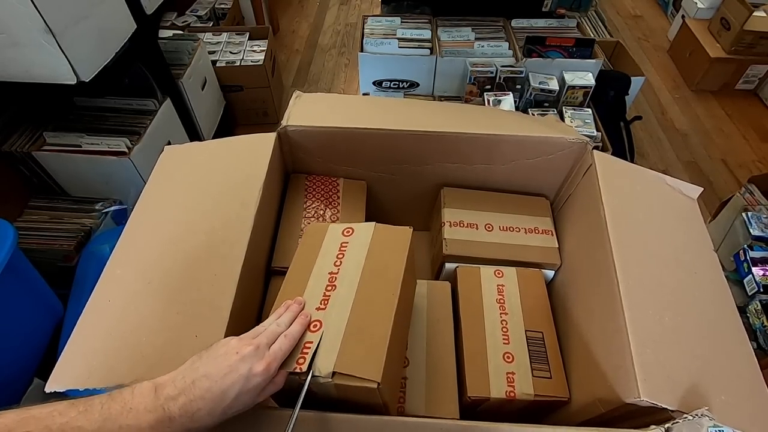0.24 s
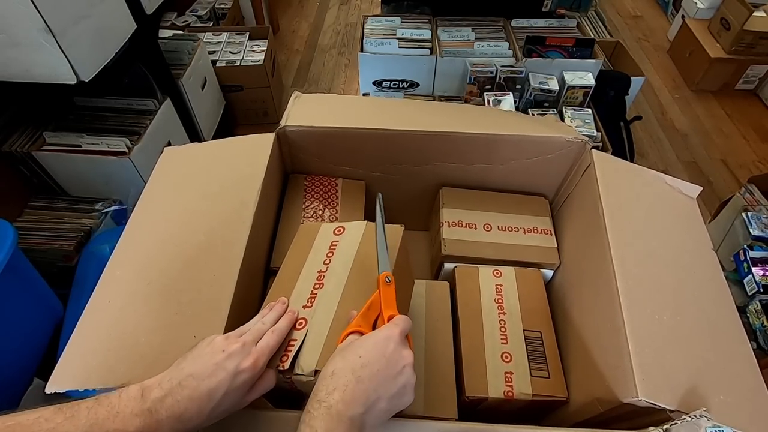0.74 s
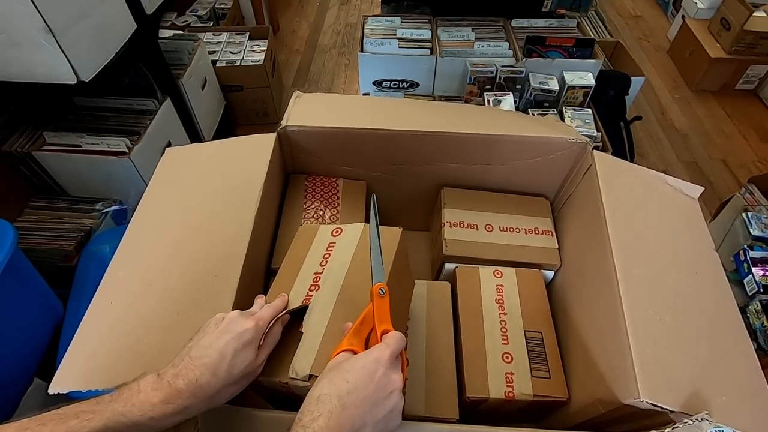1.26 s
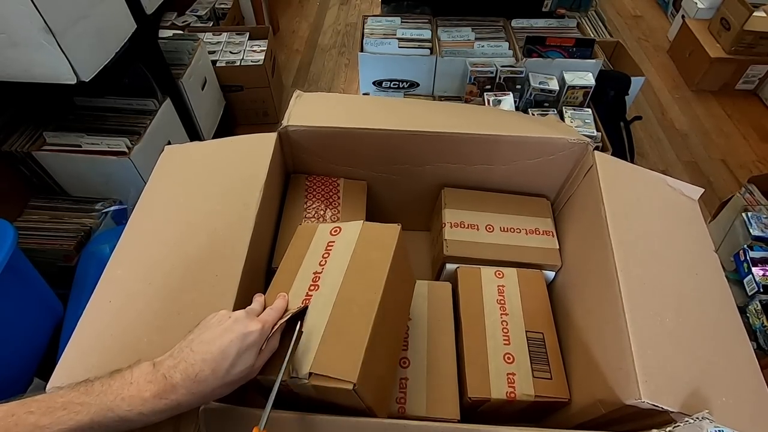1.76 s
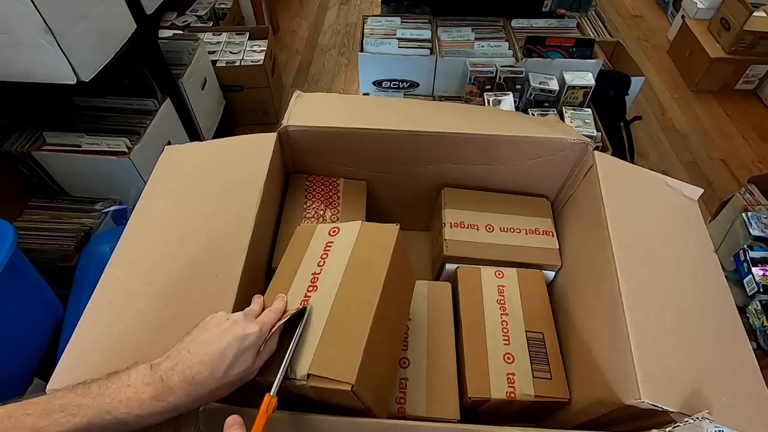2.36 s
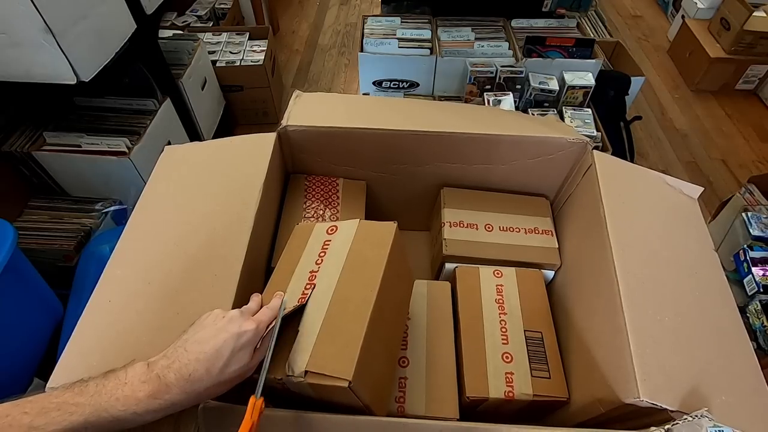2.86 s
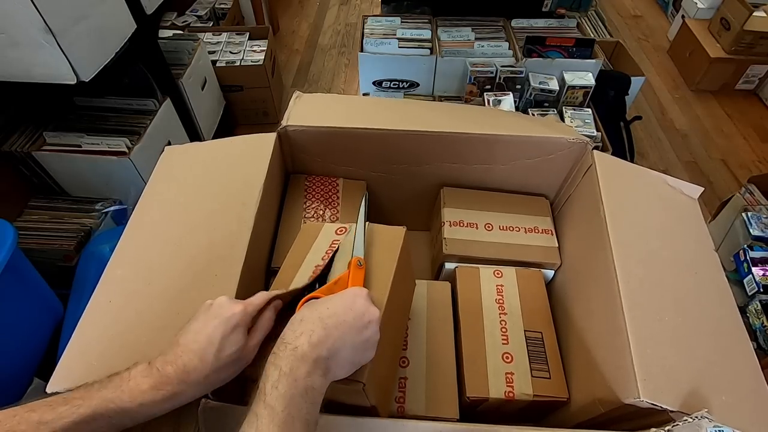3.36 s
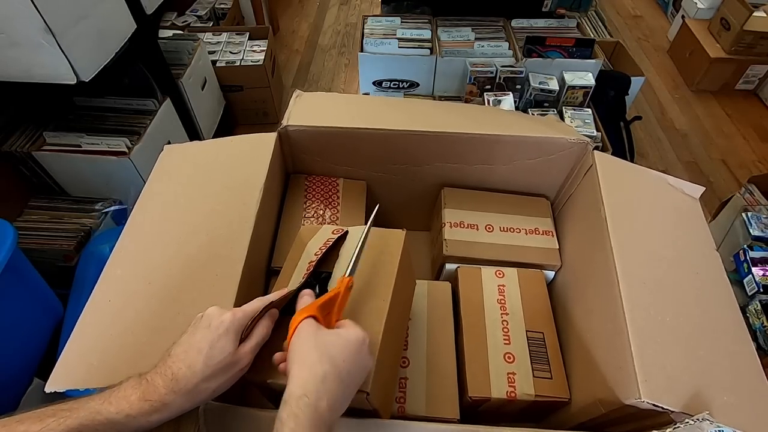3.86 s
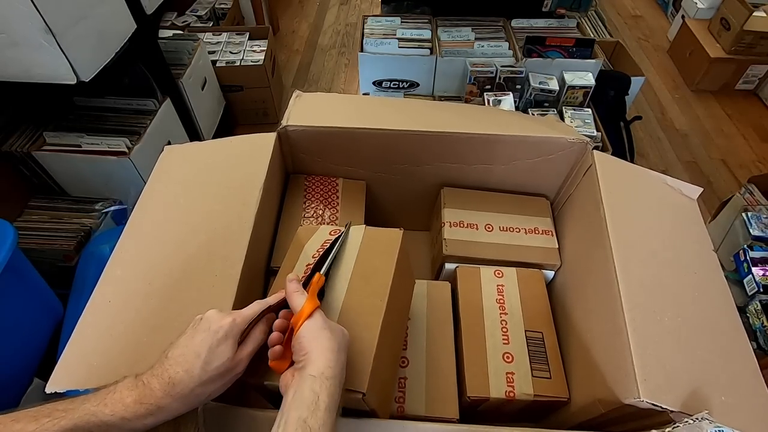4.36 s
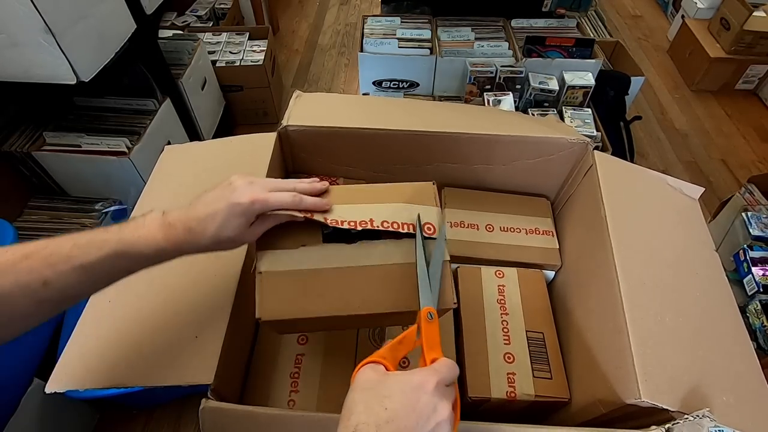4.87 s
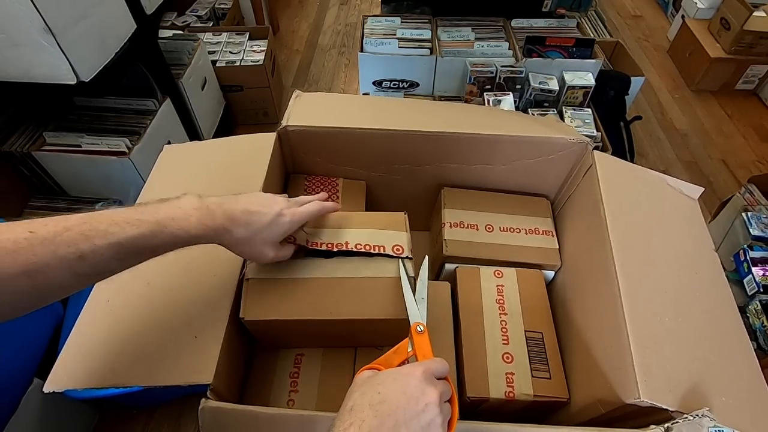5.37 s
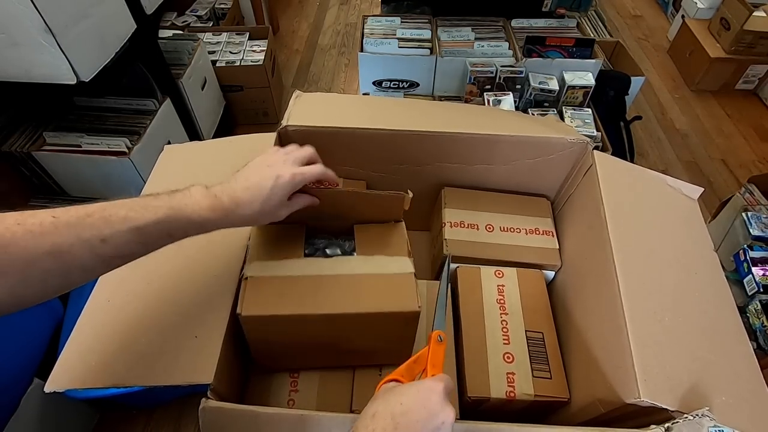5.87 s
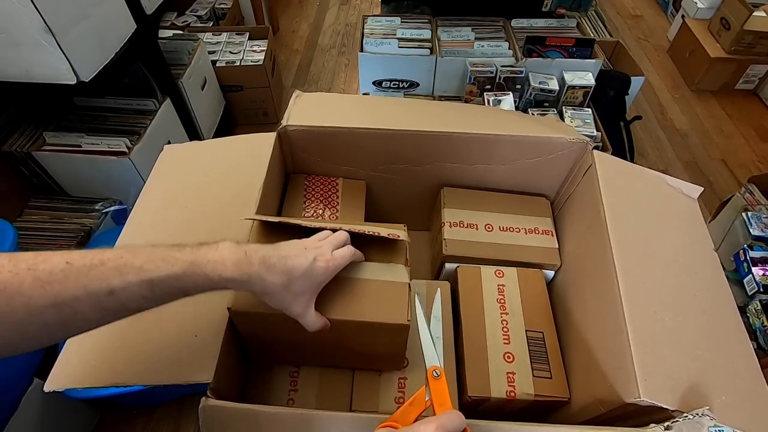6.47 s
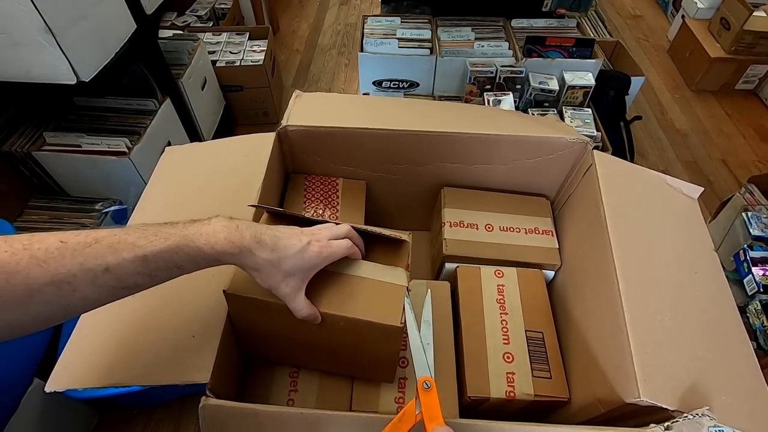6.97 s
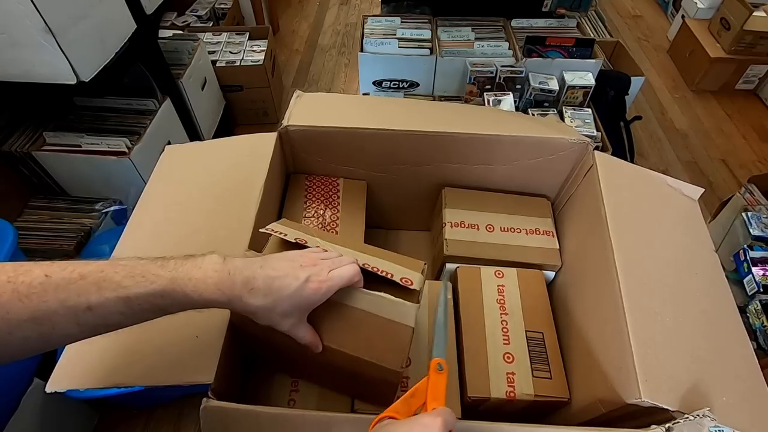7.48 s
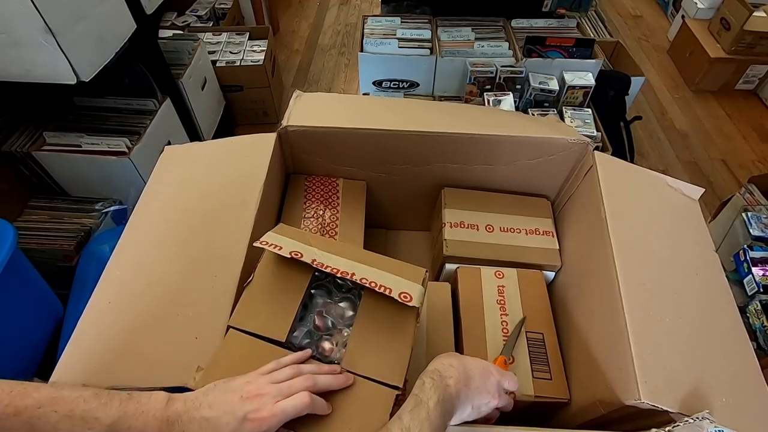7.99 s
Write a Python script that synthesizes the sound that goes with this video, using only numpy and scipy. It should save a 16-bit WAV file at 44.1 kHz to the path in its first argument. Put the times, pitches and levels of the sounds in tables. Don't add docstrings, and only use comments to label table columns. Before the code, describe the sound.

Close-up unboxing in a furnished room: quick tape rips and boxy thumps, scraping steel on card, a quieter stretch of faint scuffs, then loud crisp snips. A hollow bump follows as the box is shifted, then hands rustle and scrape stiff flaps, with creaks, small crackles and another hard snap and thump late on. Light room noise, low mount rumble, and a distant motor faintly humming in the last two seconds.

```python
import sys
import numpy as np
from scipy import signal
from scipy.fft import rfft, irfft, next_fast_len
from scipy.io import wavfile
from scipy.ndimage import uniform_filter1d, map_coordinates

SR = 44100
rng = np.random.default_rng(int(sys.argv[2]) if len(sys.argv) > 2 else 0)


def materialize(psi):
    bounded = np.clip(np.atleast_2d(psi).T, -1, 1)
    quanta = np.round(bounded * 32767).astype(np.int16)
    wavfile.write(sys.argv[1], SR, quanta)


def gain_from_decibels(decibels):
    exponent = np.asarray(decibels, float) / 20
    return 10 ** exponent


N = 362943

# (frequency [Hz], level [dB per Hz])
QUIET = [(18, -35.5), (30, -2.5), (205, 4.5), (524, -17), (735, -13.5), (2030, -21), (11600, -64),
         (15000, -44)]
# (frequency [Hz], time to fall 60 dB [s])
ROOM = [(150, 0.14), (700, 0.27), (2000, 0.24), (5000, 0.23), (12000, 0.51)]
# (frequency [Hz], difference against sum [dB])
WIDE = [(60, -43), (110, -5), (200, -8.5), (380, -11), (700, -1.5), (1290, -1.5), (2380, -7), (4400, -8.5),
        (8120, 3), (15000, -2.5)]
# (time [s], firing rate [Hz], level [dB], level an octave up [dB])
ENGINE = [
    (6.3, 59.38, -48, -65),
    (6.61, 61.14, -62, -43.5),
    (7.144, 67.04, -40, -58),
    (7.412, 66.4, -48, -56),
    (7.756, 66.4, -38.5, -52),
    (8.23, 54.8, -56, -42.5),
]
# (frequency [Hz], level [dB per Hz])
RUMBLE = [(15, -1), (30, -6), (45, 5), (70, -1.5), (110, -5.5), (200, -56), (400, -120)]
# (time [s], level [dB])
JOLTS = [(.27, -50), (.8, -46), (1.26, -53.5), (1.63, -52.5), (2.75, -48.5), (3.34, -53), (3.599, -46),
         (4.24, -59), (4.56, -42), (4.88, -43.5), (5.22, -32.5), (5.8, -37.5), (6.24, -42.5), (6.65, -39.5),
         (7.57, -40.5), (8.09, -38.5)]

# (frequency [Hz], width [Hz], level [dB])
PANEL = [(538.5, 152, -6.5), (627, 144, -2), (844, 318, -0.5), (1101, 460, -1), (1500, 445, -7),
         (2140, 560, -12)]
# (frequency [Hz], width [Hz], level [dB])
CAVITY = [(149, 44, -2.5), (215, 59, -0.5), (272.3, 46, -1.5), (385, 71, -4)]
# (frequency [Hz], level [dB per Hz])
HISS = [(710, -31.5), (1200, -6.5), (1680, -3), (1930, -3), (3800, -4.5), (5500, -11.5), (7150, -27),
        (12100, -120)]
# (frequency [Hz], level [dB per Hz])
TREBLE = [(4000, -20), (5500, -13.5), (7000, -4.5), (8300, -9.5), (9700, -9.5), (11000, -21),
          (13500, -27.5), (15800, -39.5)]
# (frequency [Hz], level [dB per Hz])
FIBRE = [(710, -66.5), (1200, -6), (1860, 1.5), (2370, -2), (3080, 1.5), (6000, -6), (7800, -35),
         (13200, -120)]

# (full load at [s], level [dB], time to gain 15 dB [s], held [s])
PRESSES = [(.27, -52.5, 0.6, 0.14), (.8, -51, 0.18, 0.52), (1.51, -52.5, 0.25, 0.11),
           (2.75, -61.5, 1, 0.45), (3.34, -45.5, 0.03, 0.28), (3.7, -54.5, 0, 0.15),
           (4.44, -33.5, -0.05, 0.003), (4.72, -40.5, 0.03, 0.004), (5.22, -63, 0.3, 0.4),
           (5.69, -52.5, -0.83, 0.054), (5.89, -60, -1, 0.7), (6.65, -53.5, -12, 0.17),
           (6.85, -55.5, -18, 0.45), (7.45, -41, 0.26, .005), (7.57, -53.5, 0, 0.78),
           (8.23, -44.5, 0.43, .005)]
# (full speed at [s], level [dB], time to gain 15 dB [s], held [s])
SLIDES = [(.03, -58, .05, .02), (.084, -44, .012, .09), (.2, -45, .05, .16), (.5, -65, .1, .15),
          (.668, -58, .006, .06), (.758, -51, .04, .02), (.86, -49, .08, .05), (.958, -45, .1, .17),
          (1.202, -37, .02, .05), (1.3, -54, .05, .06), (1.497, -46, .07, .09), (2.135, -53, .08, .01),
          (2.335, -59, .2, .002), (2.769, -42, .025, .11), (2.978, -50, .08, .005), (3.07, -64, .1, .18),
          (3.292, -47, .008, .12), (3.437, -36, .02, .1), (3.766, -49, .07, .01), (4.342, -49, .004, .08)]
# (full speed at [s], level [dB], time to gain 15 dB [s], held [s])
DRAGS = [(1.986, -55, .004, .11), (2.434, -58, .008, .03), (2.5, -51, .015, .13), (2.679, -52, .1, .005),
         (2.875, -44, .015, .015), (4.185, -49, .015, .005), (4.25, -58, .02, .005), (4.44, -44, .05, .05),
         (4.54, -44, .1, .12), (5.108, -48, .06, .02), (6.097, -49, .008, .04), (6.465, -52, .03, .02),
         (6.55, -49, .07, .005), (6.63, -54, .03, .09), (6.755, -52, .015, .03), (6.9, -43, .015, .02),
         (8.2, -50, .2, .05)]
# (full speed at [s], level [dB], time to gain 15 dB [s], held [s])
RUBS = [(1.7, -53, .012, .07), (4.7, -50, .1, .15), (4.934, -47, .12, .02), (5.3, -50, .25, .22),
        (5.6, -53, .2, .04), (5.651, -44, .004, .055), (5.718, -33, .008, .032), (5.86, -52, .1, .1),
        (6.026, -52, .1, .005), (6.226, -45, .07, .1), (6.82, -44, .015, .03), (7.04, -53, .015, .15),
        (7.18, -48, .015, .07), (7.27, -44, .025, .045), (7.392, -47, .008, .03), (7.425, -38, .03, .02),
        (7.5, -51, .05, .09), (7.673, -47, .12, .02), (7.93, -51, .25, .05), (8.052, -46, .15, .08)]
# (time [s], level [dB], pitch [Hz], length [s])
STRIPS = [
    (0.86, -60, 3900, .07),
    (1.47, -58, 2500, 0.092),
    (4.458, -48, 3800, .06),
    (4.61, -52, 3250, .1),
    (5.749, -44, 2390, 0.098),
    (6.198, -53, 3420, 0.053),
    (6.215, -55, 5500, 0.037),
    (7.183, -58, 4800, 0.09),
    (7.457, -49, 2580, .14),
]
# (time [s], peak [dB], air pitch [Hz])
THUMPS = [(0.067, -37.5, 330), (0.132, -27.5, 400), (0.177, -22.5, 381), (0.209, -28, 305),
          (0.666, -44, 172.6), (0.741, -36.5, 169.6), (0.796, -36.5, 215.6), (0.974, -30, 149),
          (1.054, -35, 161), (1.183, -24.5, 168), (1.442, -46.5, 388), (1.984, -44, 176),
          (2.508, -32.5, 137), (2.745, -29, 250), (2.771, -19, 170), (2.875, -32, 222), (3.279, -24, 172),
          (3.424, -27.5, 394), (3.477, -17.5, 282), (3.504, -22.5, 178), (4.143, -34, 164),
          (4.441, -23, 221), (4.452, -21.5, 213)]
# (time [s], peak [dB], air pitch [Hz])
BUMPS = [(4.701, -27.5, 260), (4.925, -34.5, 222), (5.0917, -8.5, 247), (5.112, -24.5, 290),
         (5.16, -29.5, 200), (5.242, -24.5, 245), (5.702, -17.5, 209), (5.743, -18, 114), (6.139, -28, 250),
         (6.159, -22.5, 114), (6.345, -36, 107), (6.546, -20.5, 167), (6.656, -29.5, 385),
         (7.309, -35, 390.5), (7.444, -10.5, 215), (7.874, -30, 210), (8.093, -21, 216), (8.215, -28, 296)]

# (time [s], peak [dB], ring [Hz], card walls [dB])
TICKS = [(0.8594, -25, 3850, -25), (0.9583, -22, 3800, -29), (1.1194, -34, 3370, -29.5),
         (1.6873, -45.5, 2040, -12), (2.212, -44, 3000, -14), (2.9825, -29.5, 2420, -27.5),
         (3.4218, -11, 4320, -5), (3.4743, -17, 2180, -7), (3.48, -7.5, 3150, -12),
         (3.5114, -30, 2441, -18), (3.7657, -36, 2290, -2), (4.0451, -35.5, 4250, -33),
         (4.0751, -28.5, 4030, -33), (4.4572, -8.5, 3670, -12.5), (4.537, -19, 3300, -17),
         (6.2436, -42.5, 2130, -25), (7.448, -8, 2430, -2)]
# (time [s], peak [dB], ring [Hz], card walls [dB])
FIBRES = [(0.2154, -14, 2670, -13), (1.055, -21, 3562, -8), (1.1812, -22, 2400, 1), (1.1838, -9, 2500, -6),
          (1.1865, -13.5, 2300, -7), (2.4867, -30.5, 2500, -11), (2.5072, -12, 1630, -14),
          (3.3705, -10.5, 2900, -10.5), (3.4268, -15, 2600, -6), (3.4322, -14, 1700, -6),
          (3.4435, -14, 2760, -11), (3.5009, -8, 3400, -1), (3.9713, -41.5, 2240, -4.5),
          (4.1704, -34, 1880, 7.5), (4.4115, -14.5, 2350, -7), (4.5511, -18.5, 3170, -13),
          (4.9816, -29.5, 3634, -11), (5.163, -29.5, 1920, 1.5), (0.1825, -11, 2920, -10),
          (3.3665, -28, 3300, -5), (3.4545, -31, 3090, -12), (3.491, -18, 2490, -12),
          (4.188, -33, 3500, -6), (4.407, -27, 2460, -2), (4.445, -17, 3710, -5), (5.7404, -7, 2320, -5.5)]
# (time [s], peak [dB], ring [Hz], card walls [dB])
RIPS = [
    (0.0827, -33, 2470, 0.5),
    (0.1785, -15.5, 2860, -4),
    (1.696, -35.5, 2160, -22),
    (2.7454, -23.5, 2020, -2),
    (2.7748, -17.5, 3680, -2.5),
    (4.339, -33, 1430, 0),
    (4.4395, -22.5, 3760, 5),
    (4.8626, -38, 6416, -23),
    (5.7371, -17.5, 3100, -34),
    (6.9062, -37.5, 3050, 4),
]
# (time [s], peak [dB], ring [Hz], card walls [dB])
CREASES = [(0.1364, -24, 1620, -4), (0.1662, -18.5, 2666, -1), (0.7459, -36.5, 1490, 3.5),
           (0.7942, -40, 3590, -3), (1.1925, -12.5, 1640, -9), (2.8761, -27, 2380, -8),
           (3.2805, -30, 2105, 5), (4.144, -41, 1570, -14), (4.1843, -30, 1880, -1.5),
           (5.0943, -33.5, 1550, 10.5), (6.465, -36, 2030, -8), (6.5455, -37, 1540, 9),
           (6.6586, -36.5, 2010, 6), (6.983, -50.5, 1500, 11), (8.097, -31, 1900, 7.5),
           (8.2234, -32, 1870, 10)]
# (time [s], peak [dB], ring [Hz], card walls [dB], burst [s])
SCUFFS = [
    (0.6638, -44, 4740, -13, 0.022),
    (1.9801, -50, 2294, -6, 0.016),
    (2.427, -50, 1750, 5, 0.027),
    (3.747, -41.5, 2210, 2, 0.025),
    (4.9231, -41, 3600, 4.5, 0.033),
    (5.7162, -16.5, 2480, -9.5, 0.04),
    (6.0895, -39.5, 1500, 0.5, 0.043),
    (6.1895, -37, 2120, -7.5, 0.036),
    (6.3403, -40, 1760, -16, 0.033),
    (7.9274, -39, 2290, 1, 0.026),
]
# (time [s], peak [dB], ring [Hz], card walls [dB])
CRACKLES = [(0.0328, -34, 2260, -11.5), (0.128, -24, 1700, -4), (0.8004, -35.5, 1510, -9),
            (0.8634, -26.5, 3750, -14), (1.065, -39, 3400, -12), (1.073, -39, 3390, -16),
            (1.14, -41, 3780, -12), (1.2984, -32, 2510, -8), (1.3606, -41, 2210, -12),
            (1.4431, -43, 2480, -9.5), (1.478, -38, 2350, -9), (1.727, -50, 4150, -12),
            (1.786, -52, 1530, -6), (1.8302, -48.5, 2750, -12), (1.8592, -49.5, 1810, -9),
            (2.3444, -45, 1940, -12), (2.9696, -28, 2200, -15), (3.3807, -28.5, 3380, -12),
            (3.3912, -20, 1620, -16), (3.718, -41, 2770, -14), (3.7579, -30, 2330, -12),
            (4.0198, -47, 3410, -22), (4.0476, -41, 3330, -19), (4.0784, -35, 3200, -25),
            (4.2527, -46, 1990, -10), (4.388, -30, 2480, -4)]
# (time [s], peak [dB], ring [Hz], card walls [dB])
RUSTLES = [(5.0404, -45, 3680, -12), (5.0479, -34, 3730, -17), (5.1744, -29, 1910, -4),
           (5.219, -34, 3750, -5), (5.2454, -30, 1590, -8), (5.343, -46, 3130, -12),
           (5.3654, -41, 5770, -14), (5.411, -49, 3730, -11), (5.4163, -32, 1740, -16),
           (5.5774, -33, 1900, -6), (5.6473, -28, 2730, -3), (6.0018, -39, 3260, -13),
           (6.141, -40, 1760, 0), (6.1686, -36, 2070, 3), (6.525, -45, 4470, -8), (6.5345, -33, 1600, -8),
           (6.5763, -45, 1900, -8), (6.622, -39, 1600, -8), (6.7484, -40, 1980, -8),
           (6.816, -36.5, 2390, 6), (6.8327, -38, 3760, 3), (6.8474, -47, 3320, -8),
           (6.8808, -52, 2780, -10), (6.9002, -34, 2020, 2), (7.0309, -48, 2820, -11),
           (7.176, -31, 2200, -6), (7.209, -30, 2680, -8), (7.2599, -28, 4470, -10),
           (7.3861, -37, 1600, -8), (7.8511, -37, 2250, -4), (7.9438, -28, 2830, -8)]

CLICK_S, RIP_S, CREASE_S, CRACKLE_S = 0.0033, 0.011, 0.0099, 0.0061
TICK_DB, FIBRE_DB, RIP_DB, CREASE_DB, SCUFF_DB, CRACKLE_DB = -13.5, -33.5, -9, -19.5, -12.5, -14.5


def unit(x):
    return x / np.sqrt(np.mean(x ** 2) + 1e-20)


def peak_one(x):
    return x / np.abs(x[:, :1]).max(axis=2, keepdims=True)


def along(points, hz):
    f, v = np.transpose(points)
    return np.interp(np.log(hz + 1), np.log(f + 1), v)


def curves(rows):
    s, *cols = np.transpose(rows)
    return [np.interp(np.arange(N) / SR, s, c) for c in cols]


def wobble(rate):
    knots = rng.standard_normal(int(N * rate / SR) + 4)
    return map_coordinates(knots, [np.arange(N) * rate / SR])


def filtered(x, response):
    m = next_fast_len(x.shape[-1] + 1024)
    spectrum = rfft(x, m) * response(np.fft.rfftfreq(m, 1 / SR))
    return irfft(spectrum, m)[..., :x.shape[-1]]


def tint(spectrum):
    return lambda f: gain_from_decibels(along(spectrum, f))


def resonance(f, hz, width):
    return 1j * f * width / (hz * hz - f * f + 1j * f * width)


def body(modes):
    return lambda f: sum((-1) ** k * gain_from_decibels(db) * resonance(f, hz, w) for k, (hz, w, db) in enumerate(modes))


def walls(f):
    return body(PANEL)(f) / (1 + 1j * f / 1800) ** 2


def hollow(f):
    return body(CAVITY)(f) / (1 + 1j * f / 700) ** 2


def place(times, shapes):
    out = np.zeros((shapes.shape[1], N + SR))
    for s, shape in zip(times, shapes):
        start = round(s * SR)
        out[:, start:start + shape.shape[1]] += shape
    return out[:, :N]


def swells(rows, sag, fall):
    s, db, rise, held = np.transpose(rows)[:, :, None]
    held = np.abs(held)
    t = np.arange(0, N, 32) / SR
    u = t - s
    early = np.maximum(-u, 0) / np.clip(np.abs(rise), .002, 3)
    each = db - 14 * early - early ** 3
    each = each - sag * np.clip(u, 0, held) - fall * np.maximum(u - held, 0)
    level = 10 * np.log10((gain_from_decibels(each) ** 2).sum(axis=0) + 1e-10)
    return np.interp(np.arange(N) / SR, t, level)


def room_tone():
    return gain_from_decibels(-62.5) * unit(filtered(rng.standard_normal((2, N)), tint(QUIET)))


def engine():
    hz, low_db, octave_db = curves(ENGINE)
    turn = 2 * np.pi * np.cumsum(hz * (1 + 0.02 * wobble(12))) / SR
    arrive = np.clip((np.arange(N) / SR - 6.25) / 0.0849, 0, 1)
    tones = gain_from_decibels(low_db) * np.sin(turn) + gain_from_decibels(octave_db) * np.sin(2 * turn)
    return arrive * gain_from_decibels(2.5 * wobble(9)) * np.sqrt(2) * tones


def mount():
    shake = unit(filtered(rng.standard_normal((2, N)), tint(RUMBLE)))
    jolts = [(*row, 0.15, 0.042) for row in JOLTS]
    together = shake[0] * gain_from_decibels([[-11], [4]])
    opposed = shake[1] * gain_from_decibels([[-5], [-12]]) * [[1], [-1]]
    return gain_from_decibels(swells(jolts, sag=0, fall=64)) * (together + opposed)


def room(x):
    step, out = SR // 3, np.zeros((2, N + 2 * SR))
    for a in range(0, N, step):
        hz, t, z = signal.stft(rng.standard_normal((2, SR * 2 // 5)), SR, nperseg=256)
        fade = gain_from_decibels(-60 * t / along(ROOM, hz)[:, None])
        tail = signal.istft(z * fade, SR, nperseg=256)[1]
        wet = signal.fftconvolve(x[None, a:a + step], tail / np.linalg.norm(tail[0]), axes=1)
        out[:, a + 200:a + 200 + wet.shape[1]] += wet
    return out[:, :N]


def patchy(x, patchy_db):
    z = signal.stft(x, nperseg=256)[2]
    field = uniform_filter1d(rng.standard_normal(z.shape[1:]), size=3, axis=0)
    field = uniform_filter1d(field, size=14, axis=1)
    return signal.istft(z * gain_from_decibels(patchy_db * unit(field)), nperseg=256)[1][:, :N]


def total(*levels_db):
    return 10 * np.log10(sum(gain_from_decibels(db) ** 2 for db in levels_db))


def rubbing():
    slide = swells(SLIDES, sag=30, fall=140)
    drags = swells(DRAGS, sag=30, fall=160)
    rub = swells(RUBS, sag=30, fall=180)
    hiss_db = total(slide, drags, rub)
    fine_db = total(slide - 12, drags - 16.5, rub - 9.5)
    panel_db = total(swells(PRESSES, sag=12.2, fall=200), drags - 8, rub - 8)
    cavity_db = -52.5 + 0.73 * (panel_db + 56.5)

    sizes = gain_from_decibels(2.4 * np.minimum(rng.exponential(size=N), 2.4))
    grains = (rng.random(N) < 700 / SR * gain_from_decibels(3 * wobble(40))) * sizes
    grit = unit(np.convolve(grains, np.exp(-np.arange(90) / 20.0))[:N])
    slips = 0.9 * wobble(90)

    def drag(share):
        return rng.standard_normal((2, N)) * (1 + share * grit) * gain_from_decibels(slips + 1.37 * wobble(150))

    surface = patchy(drag(0.22), patchy_db=2.0)
    hiss = gain_from_decibels(hiss_db - 1.23) * unit(filtered(surface, tint(HISS)))
    fine = gain_from_decibels(fine_db + 0.23) * unit(filtered(surface, tint(TREBLE)))
    panel = gain_from_decibels(panel_db) * unit(filtered(drag(1.0), walls))
    cavity = gain_from_decibels(cavity_db + 2.73 * wobble(40)) * unit(filtered(drag(0.5), hollow))
    return hiss + fine + (panel + cavity) * [[1], [.45]]


def strips():
    s, db, hz, length = np.transpose(STRIPS)[:, :, None, None]
    t = np.arange(SR // 3) / SR
    scrape = rng.standard_normal((len(s), 2, len(t)))
    ring = filtered(scrape, lambda f: resonance(f, hz, 0.14 * hz) ** 2)
    fade = np.minimum(t / 0.011, 1) * gain_from_decibels(-12 * (t / length) ** 2)
    return place(s.ravel(), gain_from_decibels(db) * fade * ring / ring.std(axis=2, keepdims=True))


def thumps():
    s, db, hz = np.transpose(THUMPS + BUMPS)[:, :, None, None]
    t60 = 0.041 * gain_from_decibels(-0.34 * (db + 30.5))
    t = np.arange(6000) / SR
    soft = (1 - np.exp(-t / 0.0022)) ** 2
    fade = gain_from_decibels(-60 * t / np.clip(t60, .025, .3))
    main = np.sin(2 * np.pi * hz * t) * fade * soft ** 2
    push = rng.standard_normal((len(s), 2, len(t))) * gain_from_decibels(-60 * t / 0.017) * soft
    stiff = np.repeat([0.19, 0.13], [len(THUMPS), len(BUMPS)])[:, None, None]
    boxes = peak_one(filtered(push, lambda f: hollow(f) + stiff * walls(f)))
    return place(s.ravel(), gain_from_decibels(db) * (peak_one(main) + 0.85 * boxes)) * [[1], [.25]]


def bursts(rows, size, sudden):
    s, db, hz, panel_db, burst, treble_db = np.transpose(rows)[:, :, None, None]
    treble_db = treble_db + 3.5 * np.log2(hz / 2500)
    t = np.arange(-64, size) / SR
    u = np.clip(t, 0, 1) / np.clip(burst, .0003, .06)
    tear = rng.standard_normal((len(s), 3, len(t))) * u ** 0.38 * np.exp(-3.2 * u)
    energy = np.linalg.norm(tear[:, :1], axis=2, keepdims=True)
    tear[:, :1] += sudden * energy * (t == 60 / SR)
    tear[:, 2:] = (t == 0) * energy * np.sqrt(1 + sudden ** 2)

    def tape_end(f):
        return tint(FIBRE)(f) * (0.38 + resonance(f, hz, 0.22 * hz) + 0.25 * resonance(f, hz, 70))

    bright = peak_one(filtered(tear, tape_end))
    panel = gain_from_decibels(panel_db) * peak_one(filtered(tear, walls))
    fine = gain_from_decibels(treble_db + 2.0) * peak_one(filtered(tear, tint(TREBLE)))
    return place(s.ravel() - 64 / SR, gain_from_decibels(db) * (bright + panel + fine))


def with_settings(table, *settings):
    return [(*row, *settings) for row in table]


def snaps():
    click_rows = with_settings(TICKS, CLICK_S, TICK_DB) + with_settings(FIBRES, CLICK_S, FIBRE_DB)
    tear_rows = with_settings(RIPS, RIP_S, RIP_DB) + with_settings(CREASES, CREASE_S, CREASE_DB)
    tear_rows = tear_rows + with_settings(SCUFFS, SCUFF_DB)
    small_rows = with_settings(CRACKLES + RUSTLES, CRACKLE_S, CRACKLE_DB)
    clicks = bursts(click_rows, size=900, sudden=1.1)
    tears = bursts(tear_rows, size=3000, sudden=0.1)
    small = bursts(small_rows, size=900, sudden=0.6)
    shared, apart, blow = clicks + tears + gain_from_decibels(-5) * small
    return np.array([shared, 0.22 * apart]), blow


def ports(pair):
    side = filtered(pair, lambda f: tint(WIDE)(f) * np.array([[.3j], [.9]])).sum(axis=0)
    return np.array([pair[0] + side, pair[0] - side])


def scene():
    tape, blows = snaps()
    box = thumps()
    wet = room(gain_from_decibels(-6) * blows + gain_from_decibels(-3) * box[0])
    near = tape + box + wet + rubbing() + strips() + room_tone()
    return ports(near) + mount() + engine()


def band_limit(x):
    return signal.sosfilt(signal.butter(12, 16290, fs=SR, output="sos"), x)


def record(dry):
    mix = filtered(dry, lambda f: f < 15830)
    return band_limit(mix)


dry = scene()
out = record(dry)
materialize(out)
```